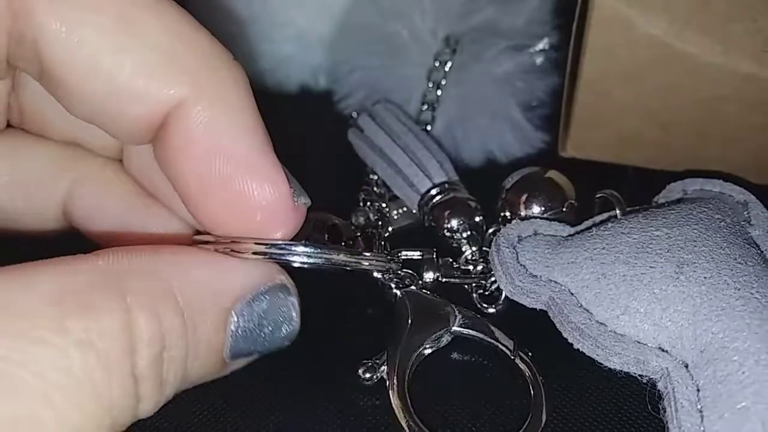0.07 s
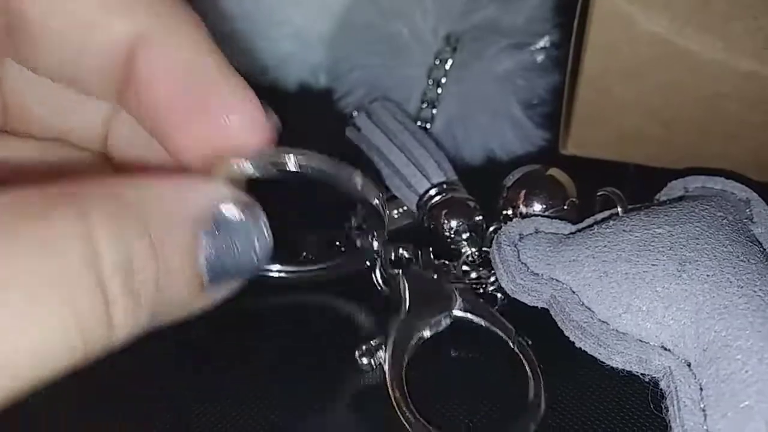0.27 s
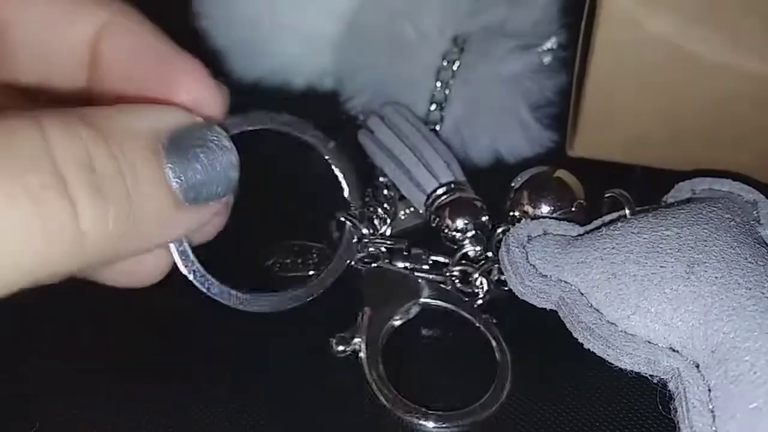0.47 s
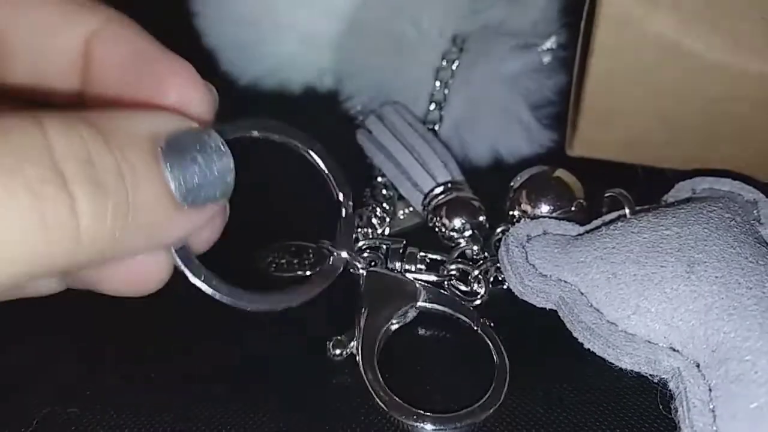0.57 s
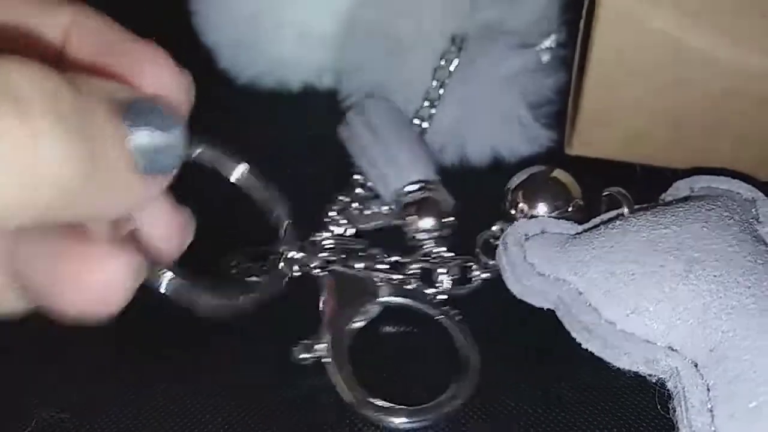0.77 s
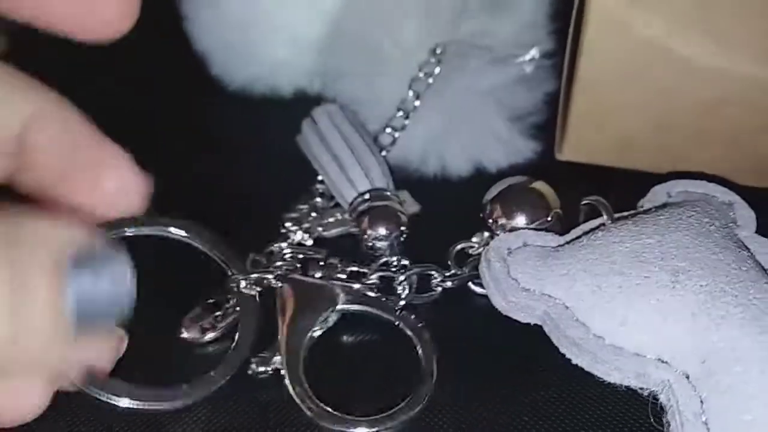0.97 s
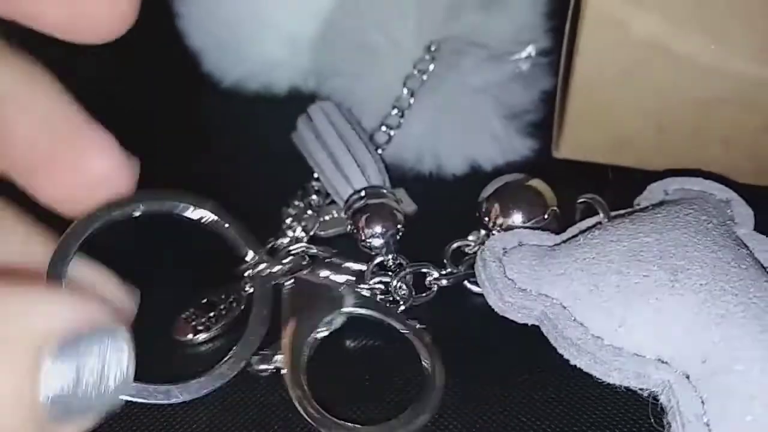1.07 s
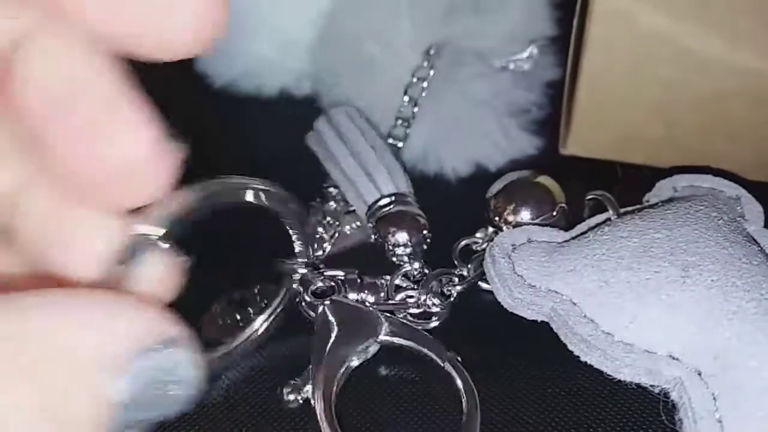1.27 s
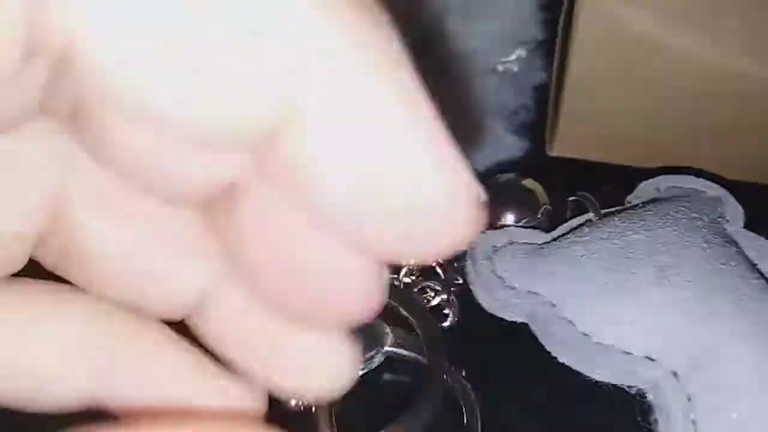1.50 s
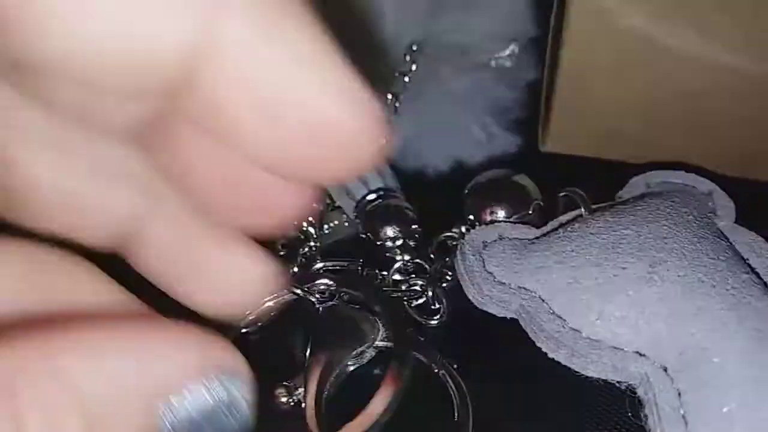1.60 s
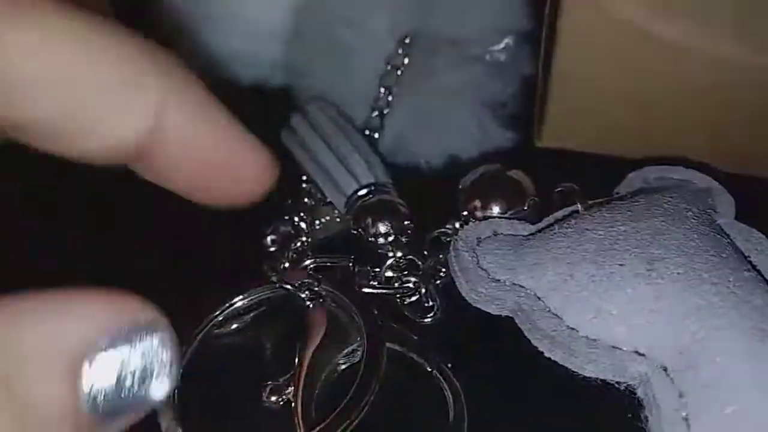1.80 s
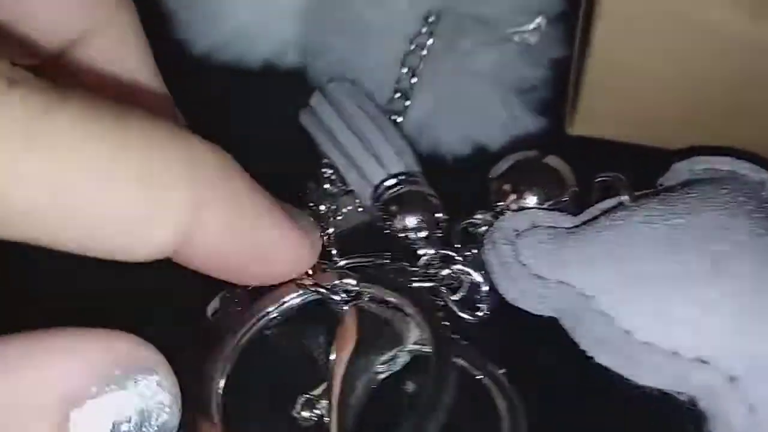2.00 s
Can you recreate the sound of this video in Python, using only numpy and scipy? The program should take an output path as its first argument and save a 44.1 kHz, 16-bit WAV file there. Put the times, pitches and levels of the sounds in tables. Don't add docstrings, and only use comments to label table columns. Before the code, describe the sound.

Keychain links tick lightly, then drag in short gritty strokes among harder knocks, until the ring falls loudly and a few faint touches follow; recorded very close indoors over soft hiss and a thin electronic whine.

```python
import sys
import numpy as np
from scipy import signal
from scipy.fft import rfft, irfft, next_fast_len
from scipy.io import wavfile
from scipy.ndimage import map_coordinates

SR = 44100
rng = np.random.default_rng(int(sys.argv[2]) if len(sys.argv) > 2 else 0)


def undo_db(level):
    steps = np.asarray(level, float) / 20
    return 10 ** steps


def dump_mix(stems):
    frames = np.atleast_2d(stems).T
    limited = np.clip(frames, -1, 1)
    pcm = np.round(limited * 32767).astype(np.int16)
    wavfile.write(sys.argv[1], SR, pcm)


N = 90404


def unit(x):
    return x / np.sqrt(np.mean(x ** 2) + 1e-20)


def wobble(rate):
    return map_coordinates(rng.standard_normal(int(N * rate / SR) + 4), [np.arange(N) * rate / SR])


def resonances(f, hz, width_hz, db):
    f = f[:, None]
    sign = (-1) ** np.arange(np.shape(hz)[-1])
    damping = 1j * f * width_hz
    return np.sum(sign * undo_db(db) * damping / (hz ** 2 - f ** 2 + damping), -1)


def filtered(x, response):
    m = next_fast_len(N + SR // 2)
    return irfft(rfft(x, m) * response(np.fft.rfftfreq(m, 1 / SR)), m)[..., :N]


def soft(f, corner_hz):
    return 1 / (1 + 1j * f / corner_hz * 2 ** .5 - (f / corner_hz) ** 2)


# f/Hz, level/dB per Hz
HISS_SPECTRUM = [(30, -58), (60, -3), (280, -2), (900, -5), (4000, -14.5), (7000, -16), (12000, -18),
                 (15500, -17)]
# f/Hz, width/Hz, level/dB
DRONE_MODES = [(82, 76, -7), (245.2, 40, -4.5), (416.7, 84, -7.5)]
# f/Hz, width/Hz, level/dB
FAR_MODES = [(1954, 330, 13.5), (2960, 620, 9), (3680, 300, 11)]
# t/s, level/dB
FAR_COURSE = [
    (0, -76),
    (1.5, -83),
    (1.699, -57.5),
    (1.88, -59.5),
    (2.05, -101),
]
HISS_DB, DRONE_DB = -57, -61


def floor():
    hz, db = np.transpose(HISS_SPECTRUM)
    hiss = unit(filtered(rng.standard_normal(N),
                         lambda f: undo_db(np.interp(np.log(f + 1), np.log(hz), db))))
    drone, far = (unit(filtered(rng.standard_normal(N), lambda f: resonances(f, *np.transpose(modes)) ** 2))
                  for modes in (DRONE_MODES, FAR_MODES))
    far_db = np.interp(np.arange(N) / SR, *np.transpose(FAR_COURSE)) + 2.5 * wobble(39.85)
    drone_db = DRONE_DB + 1.1 * wobble(9.8)
    return undo_db(HISS_DB) * hiss + undo_db(drone_db) * drone + undo_db(far_db) * far


REFRESH_HZ, REFRESH_S = 60, .0031
WHINE_HZ, WHINE_WANDER_HZ = 8263, 80
WHINE_DB, WHINE_ROUGH_DB, TICK_DB = -53, 2.6, -35
WHINE_RISE_S, WHINE_ON_S, WHINE_FALL_S = .001, 0.013, 0.00026


def screen():
    t = np.arange(N) / SR
    since = (t - REFRESH_S) % (1 / REFRESH_HZ)
    rise = np.clip(since / WHINE_RISE_S, 0, 1)
    fall = np.clip((WHINE_ON_S - since) / WHINE_FALL_S, 0, 1)
    phase = 2 * np.pi * np.cumsum(WHINE_HZ + WHINE_WANDER_HZ * wobble(400)) / SR
    whine = undo_db(WHINE_DB + WHINE_ROUGH_DB * wobble(400)) * rise * fall * np.sin(phase)
    tick = (since < 1 / SR) * undo_db(0.74 * rng.standard_normal(N))
    tick = filtered(tick, lambda f: resonances(f, np.array([10300]), 6600, [0]) ** 2)
    return whine + undo_db(TICK_DB) * tick


# t/s, level/dB, f/Hz, cycles
THUMPS = [
    (1.471, -34, 111, 0.43),
    (1.9803, -29, 352, 2.6),
]


def thumps():
    out = np.zeros(N)
    for s, db, hz, cycles in THUMPS:
        progress = np.clip((np.arange(N) / SR - s) * hz / cycles, 0, 1)
        out += undo_db(db) * np.sin(np.pi * progress) ** 2 * np.sin(2 * np.pi * cycles * progress)
    return out


FOCUS_OCT, FOCUS_FLOOR_DB = .6, -6.5
LOW_LOSS_DB = 1.5


def focus(hz, pitch_hz):
    loss_db = -6 * (np.log2(hz / pitch_hz) / FOCUS_OCT) ** 2
    return np.maximum(loss_db, FOCUS_FLOOR_DB - LOW_LOSS_DB * (hz < pitch_hz))


# f/Hz, width/Hz, level/dB
BODY = [(573, 169, 1.5), (747, 114, 6), (1210, 330, 5), (1807, 264, 3.5), (2223, 486, 3.5), (2750, 584, 4),
        (3480, 420, 4.5), (4170, 1570, -2.27), (5510, 475, 2), (6000, 1100, -4)]
# f/Hz, width/Hz, level/dB
STEEL = [(7440, 150, -7), (10260, 210, -4), (11210, 240, -4), (12180, 200, 3.5), (13700, 200, -3.5),
         (15500, 470, -31)]
# start t/s, hardest t/s, end t/s, pressure level/dB, pitch f/Hz
STROKES = [(0.148, 0.225, 0.23, -42.5, 2750), (0.247, 0.303, 0.5, -47, 2530),
           (0.33, 0.408, 0.44, -38, 2500), (0.498, 0.514, 0.52, -39.5, 2700),
           (0.598, 0.655, 0.75, -50, 2440), (0.674, 0.727, 0.79, -38, 2180), (0.784, 0.81, 0.94, -37, 2290),
           (0.923, 1.005, 1.18, -51, 2320), (1.102, 1.12, 1.27, -47.5, 1920),
           (1.15, 1.187, 1.266, -37.5, 1930), (1.198, 1.186, 1.32, -36, 2500),
           (1.29, 1.34, 1.44, -50, 2400), (1.339, 1.413, 1.46, -35, 2540),
           (1.474, 1.485, 1.543, -28.5, 1920), (1.53, 1.544, 1.59, -53, 1610),
           (1.584, 1.58, 1.674, -47, 1570), (1.894, 1.906, 1.91, -38.5, 2570),
           (1.897, 1.909, 2.03, -41.5, 760), (1.9, 1.946, 1.966, -40, 2340),
           (1.955, 1.968, 1.982, -43, 1210), (1.99, 1.995, 1.79, -45, 1570)]
DRAG_PER_S, DRAG_SPREAD_DB, DRAG_HISS = 1000, 3, .35
STROKE_EDGE = 0.49
DRAG_STEEL_DB, DRAG_STEEL_GROWS = -16, 0.82
DRAG_PING_DB = -15
LOOSE_PING_DB, LOOSE_UNTIL_S = 9, .47
PING_WIDTH_HZ, SOFT_HZ = 450, 6000


def drag():
    out, size = np.zeros(N + SR), 8192
    f, t = np.fft.rfftfreq(size, 1 / SR), np.arange(size) / SR
    hz, width, db = np.transpose(BODY)
    flutter = undo_db(1.57 * wobble(160))
    for start, hardest, end, level_db, pitch_hz in STROKES:
        grains = (rng.random(size) < DRAG_PER_S / SR) * rng.standard_normal(size)
        grains *= undo_db(DRAG_SPREAD_DB * np.minimum(rng.exponential(size=size), 3))
        force = rfft(unit(grains) + DRAG_HISS * rng.standard_normal(size))
        modes = resonances(f, hz, width, db + focus(hz, pitch_hz))
        ping_db = DRAG_PING_DB + LOOSE_PING_DB * (start < LOOSE_UNTIL_S)
        ping = 6.5 + resonances(f, np.array([pitch_hz]), 2 * PING_WIDTH_HZ, [ping_db])
        body = unit(irfft(force * soft(f, SOFT_HZ) * modes * ping))
        steel = unit(irfft(force * resonances(f, *np.transpose(STEEL))))
        steel_db = DRAG_STEEL_DB + DRAG_STEEL_GROWS * (level_db + 34)
        swell = np.interp(t + start, [start, hardest, end], [0, 1, 0]) ** STROKE_EDGE
        out[round(start * SR):][:size] += undo_db(level_db) * swell * (body + undo_db(steel_db) * steel)
    return out[:N] * flutter


# t/s, peak level/dB, pitch f/Hz, steel ring over the
# knock level/dB
KNOCKS = [(0.5095, -20, 1750, 0.5), (0.7868, -22.5, 1250, 2.5), (0.9046, -24, 1430, -35),
          (0.9429, -14, 1690, -39), (0.9703, -17.5, 1380, -10), (1.1659, -27, 1710, -34),
          (1.2026, -13, 1220, -14), (1.3816, -17.5, 1560, -22), (1.4334, -25, 1610, -21),
          (1.463, -26, 2400, -19), (1.4745, 0.5, 1575, -1.5), (1.4952, -10, 1870, 4.5),
          (1.5082, -28, 1750, 8), (1.516, -23, 1950, 3), (1.5323, -11, 1450, -15),
          (1.5451, -15.5, 1781, -3), (1.5876, -12.5, 1840, -33), (1.5924, -30.5, 1600, 7),
          (0.7885, -15, 680, -10), (1.01, -35, 560, -34), (1.029, -31, 1500, -30), (1.103, -40, 1500, -25),
          (1.188, -32, 1100, -25), (1.051, -40, 1800, -10), (0.928, -37, 2000, -25),
          (1.068, -32, 3300, -25), (1.485, -15, 1500, -8), (1.888, -31.5, 1800, -25),
          (1.905, -23.5, 260, -17), (1.948, -33.5, 3300, -13), (1.966, -37, 1400, -28),
          (2.002, -40, 1600, -20), (0.6935, -31, 2150, -18), (0.62, -30, 1100, -25),
          (0.7175, -30, 2600, -25), (0.7235, -33, 1400, -10), (0.7328, -26, 2600, -15),
          (0.197, -25, 2200, -25), (0.15, -35, 2400, -30)]
# t/s, peak level/dB, steel ring over the link
# level/dB
LINKS = [(0.1658, -31, -35), (0.1741, -25, -32), (0.1787, -21, -11), (0.1852, -53, -20),
         (0.1897, -26, -17), (0.1941, -19.5, -31), (0.2035, -28, -28), (0.2106, -29, -38),
         (0.2222, -21, -1.5), (0.2463, -20.5, -28), (0.2613, -31, -21), (0.28, -32, -27),
         (0.2924, -25.5, -10), (0.3163, -22.5, -4), (0.3621, -30.5, -32), (0.3707, -26, -38),
         (0.3839, -19.5, -25), (0.388, -25, -31), (0.4049, -33, 7), (0.4111, -18.5, -30),
         (0.4157, -16.5, -3), (0.4309, -17.5, -9), (0.4516, -28, -15), (0.4962, -27, -9),
         (0.5013, -22, -7), (0.5235, -23.5, -20), (0.5268, -23, -1), (0.6093, -26, -1.5),
         (0.6307, -18.5, -33),
         (0.6348, -46, 7), (0.6645, -29.5, -13), (0.7115, -24, -30), (0.727, -42, -29),
                 (0.743, -41, -17), (0.7551, -39, -24), (0.8058, -17.5, -3.5), (0.8158, -29, -5),
                 (0.8226, -46, -24), (0.8301, -23, -28), (0.8463, -23.5, -4), (0.8554, -26, -30),
                 (0.8641, -28, -29), (0.8694, -28, -19), (0.8755, -24, -35), (0.8817, -21.5, -0.5),
                 (0.8859, -15, -34), (1.0404, -23.5, -23), (1.0751, -24, -31), (1.0814, -29, 0),
         (1.1385, -26, -35), (1.1537, -24, -37), (1.176, -24, -10), (1.2113, -17.5, -1.5),
                  (1.219, -11.5, -19), (1.2277, -16, -10), (1.2347, -24, 1), (1.2493, -39, 5),
                  (1.2582, -21.5, -2), (1.3687, -33, -8), (1.396, -34, 2), (1.4133, -29, 2.5),
                  (1.4168, -39, -21), (1.4246, -36, -27), (1.8978, -25.5, -4), (1.281, -31.5, -1.5),
                  (1.334, -44.5, 8), (1.386, -26, 0), (1.446, -40, 3), (1.162, -33, -25),
                  (0.8885, -41, -18),
         (0.148, -36, -26), (0.2088, -16, -18), (0.2255, -18, -22), (0.249, -22, -10), (0.479, -40, -20),
           (0.577, -34.5, -5), (0.799, -17, -18), (1.063, -30.5, -7), (1.117, -27.5, -29.5),
           (1.341, -28.5, -13), (1.478, -7.5, -12), (1.4908, -13, -10), (1.9025, -25, -9), (1.908, -30, 0),
           (1.938, -28, -8), (1.995, -33.5, -13), (0.802, -15.5, -7)]
DETUNE, STEEL_DETUNE = .025, 0.0094
MODE_SCATTER_DB, STEEL_SCATTER_DB = 2, 3
CHATTER_T60, CHATTER_DB, CRACK_DB = .03, -19, -10
KNOCK_PING_DB, LINK_PING_DB = -1.5, 3.5


def contacts():
    out, size = np.zeros(N + SR), 4096
    f, t = np.fft.rfftfreq(size, 1 / SR), np.arange(size) / SR
    hz, width, db = np.transpose(BODY)
    steel_hz, steel_width, steel_mode_db = np.transpose(STEEL)
    fade = np.clip(4 - 4.5 * t / t[-1], 0, 1)
    starts = [stroke[0] for stroke in STROKES]
    links = [(s, peak_db, STROKES[np.searchsorted(starts, s) - 1][-1], steel_db)
             for s, peak_db, steel_db in LINKS]
    for s, peak_db, pitch_hz, steel_db in KNOCKS + links:
        if s < LOOSE_UNTIL_S:
            ping_db = LOOSE_PING_DB
        else:
            ping_db = LINK_PING_DB if pitch_hz > 2100 else KNOCK_PING_DB
        grit = rng.standard_normal(size)
        force = undo_db(CHATTER_DB - 60 * t / CHATTER_T60) * grit * abs(grit) / 2
        force[0] = 1
        mode_hz = hz * (1 + DETUNE * rng.standard_normal(len(hz)))
        mode_db = db + focus(hz, pitch_hz) + MODE_SCATTER_DB * rng.standard_normal(len(hz))
        ping = 4 + resonances(f, np.array([pitch_hz]), PING_WIDTH_HZ, [ping_db])
        knock = resonances(f, mode_hz, width, mode_db) * ping
        knock = irfft(rfft(force) * knock * soft(f, SOFT_HZ), size)
        force[0] = 0.72
        ring_hz = steel_hz * (1 + STEEL_DETUNE * rng.standard_normal(len(steel_hz)))
        ring_db = steel_mode_db + STEEL_SCATTER_DB * rng.standard_normal(len(steel_hz))
        crack = undo_db(CRACK_DB) * resonances(f, np.array([11000]), 13500, [0])
        ring = irfft(rfft(force) * (resonances(f, ring_hz, steel_width, ring_db) + crack), size)
        both = knock / abs(knock).max() + undo_db(steel_db) * ring / abs(ring).max()
        out[round(s * SR):][:size] += undo_db(peak_db) * fade * both
    return out[:N]


ROOM_T60, ROOM_DB = 0.26, -18


def room(x):
    t = np.arange(SR // 3) / SR
    tail = signal.lfilter([1], [1, -.6], rng.standard_normal(len(t))) * undo_db(-60 * t / ROOM_T60)
    return signal.fftconvolve(np.pad(x, (200, 0)), tail / np.linalg.norm(tail))[:N]


# f/Hz, width/Hz, echo level/dB
TABLE_DIP = (896, 169, -2.5)
ROLL_HZ = 14800


def scene():
    hardware = filtered(contacts() + drag(), lambda f: soft(f, ROLL_HZ) ** 2
                        * (1 - resonances(f, *np.transpose([TABLE_DIP]))))
    return (hardware + undo_db(ROOM_DB) * room(hardware) + thumps() + screen() + floor())[None]


def top_cut(x):
    return signal.sosfilt(signal.butter(12, 17140, fs=SR, output="sos"), x)


CLIP = 1.15
TOP_HZ, OVER_TOP_DB = 15900, -22


def record(dry):
    rounded = CLIP * np.tanh(dry / CLIP)
    mix = filtered(rounded, lambda f: undo_db(OVER_TOP_DB * (f > TOP_HZ)))
    return top_cut(mix)


dry = scene()
out = record(dry)
dump_mix(out)
```